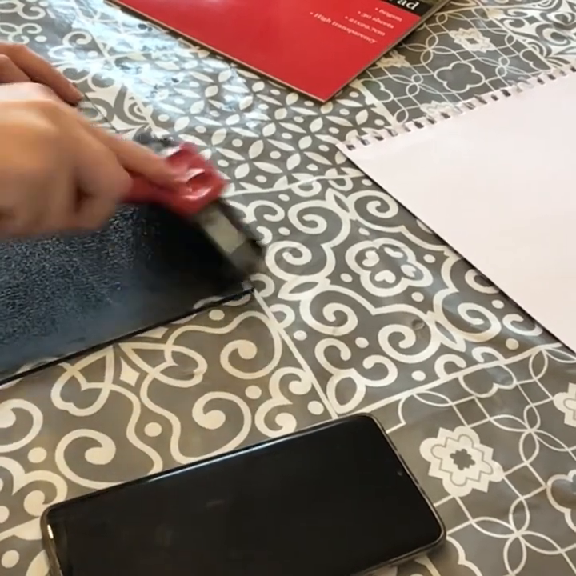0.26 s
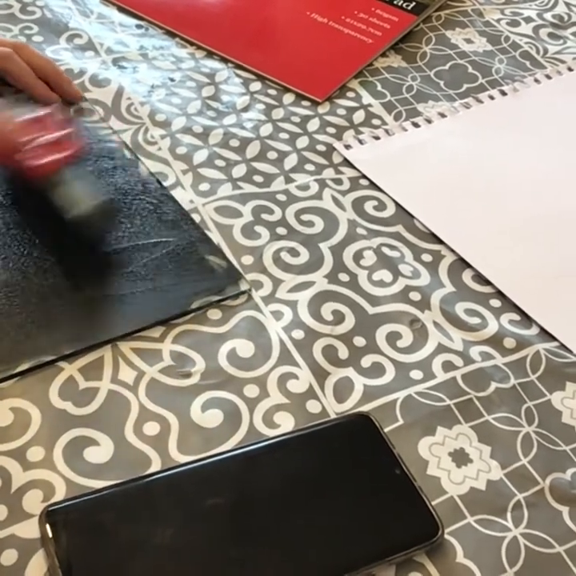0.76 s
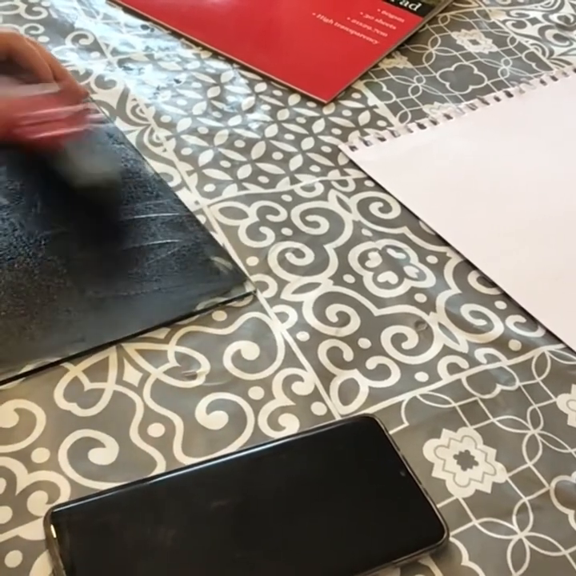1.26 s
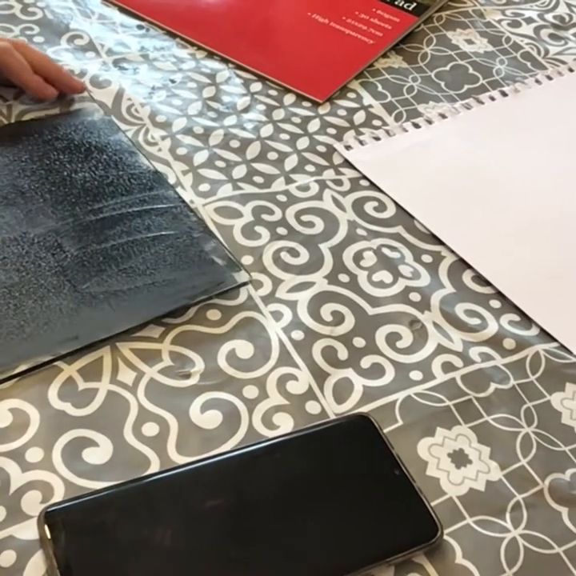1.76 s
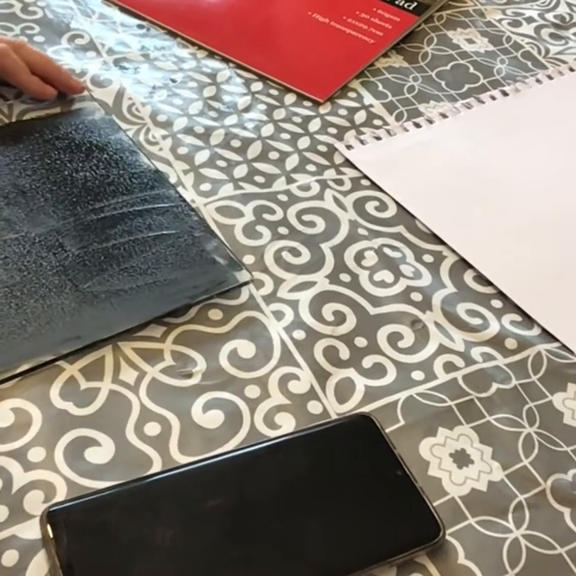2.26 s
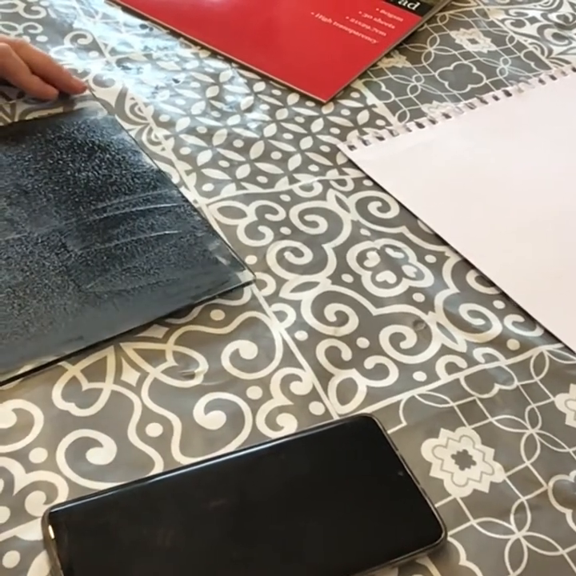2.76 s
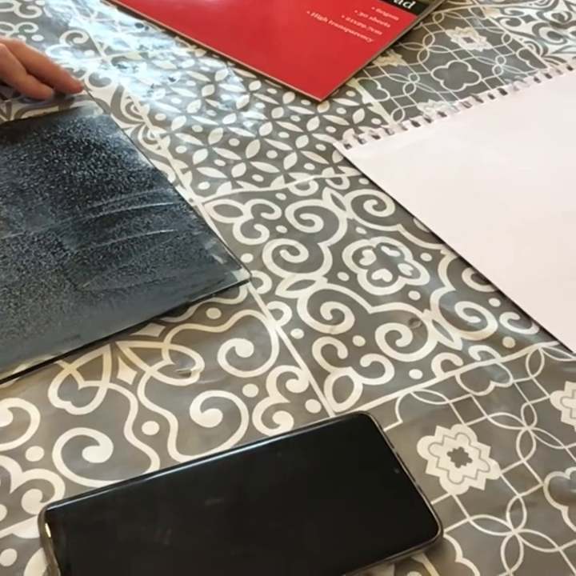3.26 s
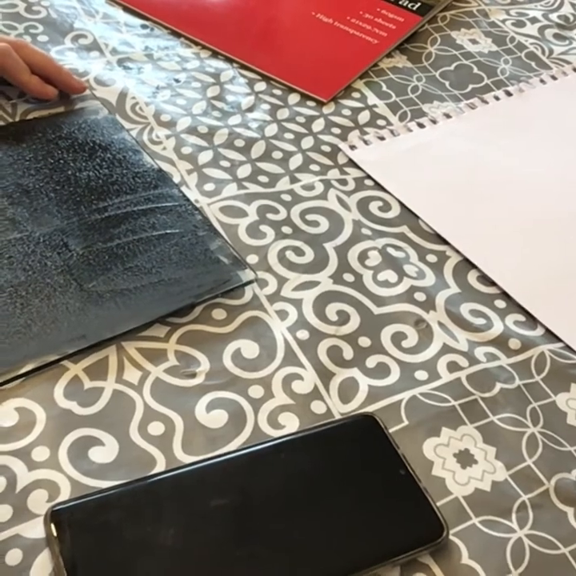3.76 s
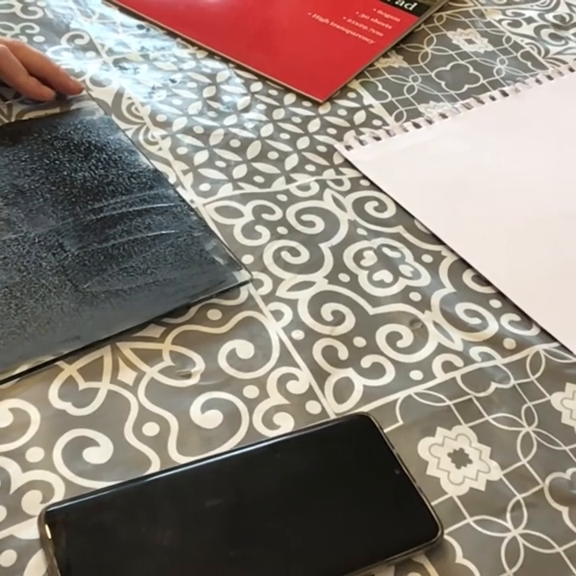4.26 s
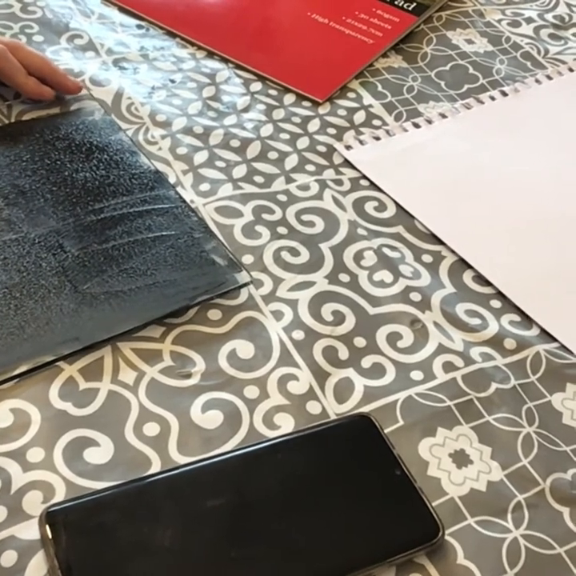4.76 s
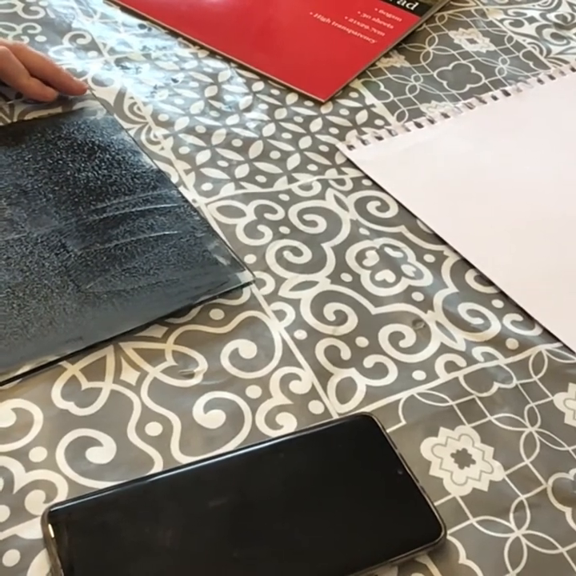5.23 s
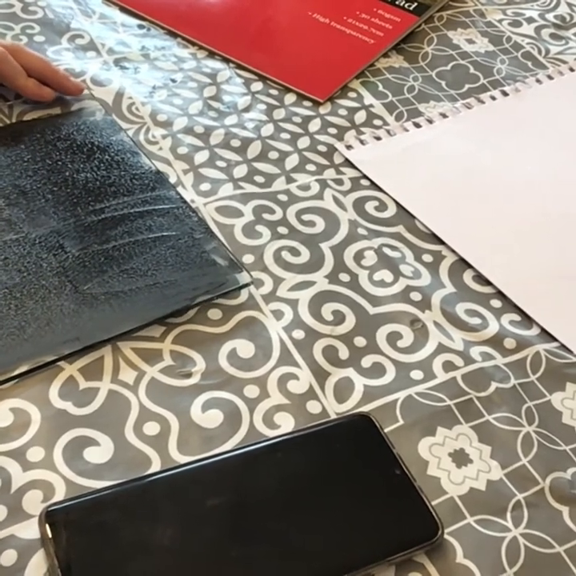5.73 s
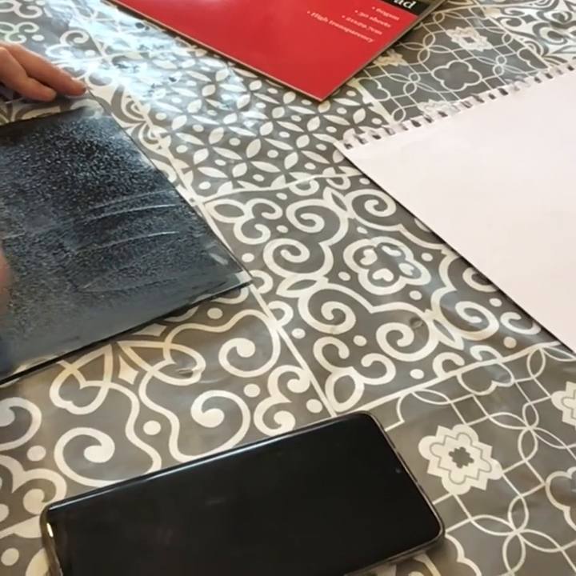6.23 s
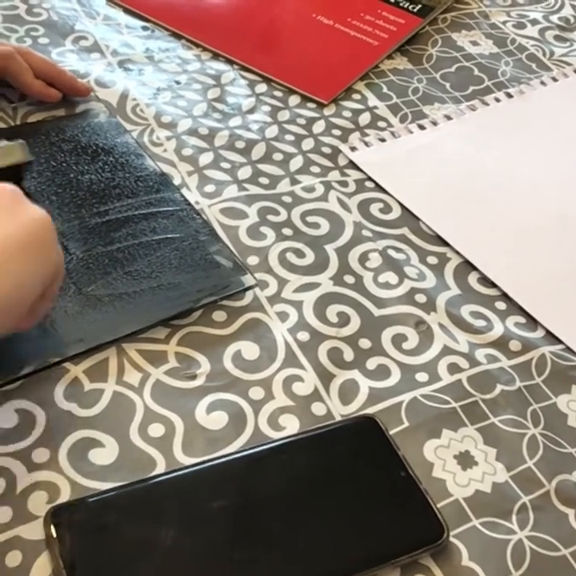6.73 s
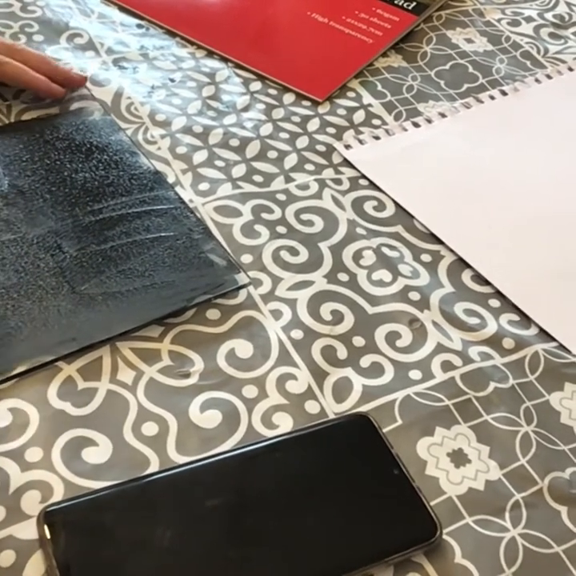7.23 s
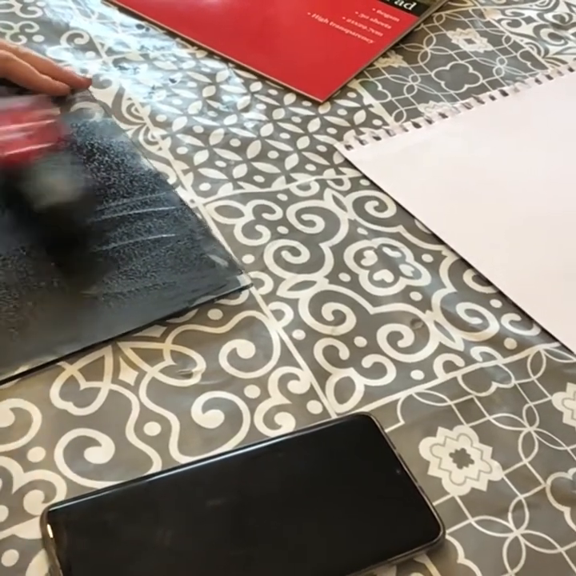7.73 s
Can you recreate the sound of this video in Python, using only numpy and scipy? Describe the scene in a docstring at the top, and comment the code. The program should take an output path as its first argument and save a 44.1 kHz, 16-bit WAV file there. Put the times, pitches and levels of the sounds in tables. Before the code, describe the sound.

From the start, a rubber roller runs back and forth through tacky ink on a glass plate, about six short strokes a second. Each is a bright, hissing crackle with small snaps over a light rasp and rumble. Soft hand thuds come through the table between 1 and 3 seconds, and the strokes briefly weaken around 2.3. Near 3.9 the roller lifts and its loose axle ticks faintly; at 4.3 it lands with a knock. Rolling resumes with heavier pressure and more rumble, then turns much softer from 5.8 until about 7.1. The axle ticks again, the roller's frame clacks sharply on the glass at 7.5, and the rubber knocks down just after. Two longer, strong strokes finish at about 8 seconds. The microphone is near the table in a small room with slight reverberation and a faint hum.

```python
"""Inking a roller on glass

A small room, one small microphone, near enough to the table for the direct sound to lead the room.
A rubber roller is pulled and pushed through tacky ink on a glass plate; ink threads snap behind it
in a bright crackle. The harder the stroke and the hand's pressure, the more the roller rasps and the
plate rumbles. Twice the roller is lifted, rattles in its frame and is set down with a knock."""
import sys
import numpy as np
from scipy import signal
from scipy.fft import rfft, irfft, next_fast_len
from scipy.io import wavfile
from scipy.ndimage import uniform_filter1d, map_coordinates

SR = 44100
rng = np.random.default_rng(int(sys.argv[2]) if len(sys.argv) > 2 else 0)


def generate_wav(signal):
    """Clip the signal to [-1, 1] and save it as 16-bit WAV at the path in sys.argv[1]."""
    frames = np.transpose(np.atleast_2d(signal))
    scaled = np.clip(frames, -1, 1) * 32767
    pcm = np.round(scaled).astype(np.int16)
    wavfile.write(sys.argv[1], SR, pcm)


N = 352359

# strokes of the roller, pull and push in turn: start/s, length/s, strength/dB
ROLLER_STROKES = [(.003, 0.076, -5.5), (0.149, 0.098, -3), (0.31, 0.093, -1.5), (0.463, 0.092, 0.5),
                  (.61, 0.094, -2), (0.766, 0.096, 2), (0.908, 0.11, 1), (1.075, 0.12, 2.5),
                  (1.218, 0.22, 0), (1.495, 0.13, -2.5), (1.652, 0.19, -2), (1.897, 0.15, -2),
                  (2.101, 0.15, -.5), (2.31, .11, -14), (2.504, 0.11, -6.5), (2.632, .1, -2.5),
                  (2.792, 0.09, 2.5), (2.951, 0.1, -1.5), (3.107, 0.083, 1.5), (3.234, 0.12, -2.5),
                  (3.412, 0.096, 0.5), (3.558, 0.085, -1.5), (3.734, 0.11, -4.5), (4.284, 0.12, 1.5),
                  (4.472, 0.12, -4.5), (4.649, 0.12, .5), (4.802, 0.11, -6), (4.971, 0.093, -2),
                  (5.116, 0.12, -6.5), (5.286, .14, 1.5), (5.506, 0.12, -2), (5.64, 0.11, 1),
                  (5.821, 0.094, -10), (5.946, 0.12, -9), (6.123, 0.089, -9.5), (6.254, 0.086, -11.5),
                  (6.393, 0.066, -14.5), (6.538, 0.061, -16.5), (6.638, 0.097, -18.5), (6.798, .1, -13.5),
                  (6.932, 0.15, -9.5), (7.584, 0.26, 1), (7.863, 0.22, 0.5)]
# the rubber lands on the plate: t/s, level/dB, contact cut-off/Hz
LANDINGS = [(1.142, -56.5, 1200), (2.336, -54.5, 1800), (2.635, -47, 2360), (2.942, -46, 2180),
            (3.253, -52.5, 2230), (3.785, -43.5, 2210), (4.2767, -23, 1880), (6.955, -50.5, 1380),
            (7.01, -43, 1680), (7.5781, -24.5, 1710)]
OTHER_END_S = 0.002724  # the roller's second end lands this long after the first


def ink(crackle_db=-37.5, snap_db=-6, snap_t60=0.012, splat_db=-3):
    """Ink threads stretch behind the roller and snap, a few loudly; each landing snaps some too."""
    # the thickest threads part with one loud snap: t/s, level/dB
    thick_snaps = [(.045, -19), (0.158, -20), (.179, -17.5), (0.503, -14), (0.7812, -22), (1.127, -13),
                   (1.541, -20.5), (1.589, -20), (2.393, -26.5), (2.511, -25), (2.7991, -22.5), (3.11, -25),
                   (3.443, -17), (3.573, -26), (4.662, -19.5), (4.977, -27), (4.996, -23), (5.368, -21),
                   (5.963, -25.5), (6.263, -25), (6.3234, -29), (6.802, -40), (6.824, -36), (6.844, -32),
                   (6.8497, -28)]
    # the ink's crackle as heard, with the microphone's bright resonance near 12 kHz: f/Hz, level/dB
    spectrum = [(1500, -44.5), (3500, -23), (5000, -16), (6700, -7.5), (7700, -10), (9000, -10.5),
                (10100, -16.5), (10900, -4), (11800, 4), (12500, 0), (13600, -7), (15000, -7), (16000, -15)]
    pops = amp(crackle_db) * stroke_bursts(
        [db for _, _, db in ROLLER_STROKES], rate=1800, spread_db=4.5, life_s=0.00039,
        hiss=0.26, arch=2.1, lead_s=0, clump_db=3.0, rate_by_strength=0.73)
    splats = [(s + OTHER_END_S, db + splat_db) for s, db, _ in LANDINGS]
    t = np.arange(SR // 50) / SR
    for s, db in thick_snaps + stroke_snaps() + splats:
        add(pops, s, amp(db + snap_db) * fade(t, snap_t60) * rng.standard_normal(len(t)))
    crackle = coloured(pops, lambda hz: amp(along(spectrum, hz)))
    return shifting_colour(crackle, depth_db=1.7, window=256)


def stroke_snaps(breakaway_s=0.0046, push_sticks_db=4, scatter_db=15):
    """Ink set during the turn lets go, harder on a push; then two thicker threads part at random."""
    snaps = []
    for k, (start, length, strength_db) in enumerate(ROLLER_STROKES):
        release = start + breakaway_s
        snaps.append((release, -35.5 + 0.64 * strength_db - push_sticks_db * (-1) ** k))
        for place, weakness in rng.random((2, 2)):
            delay = 0.54 * length * place ** 1.1  # mostly early in the stroke
            snaps.append((release + delay, -29 + 0.19 * strength_db - scatter_db * weakness))
    return snaps


def rolling(rasp_db=-53.5, rumble_db=-56.5):
    """Rolling shakes the roller and the plate, from a little before the ink begins to tear."""
    # resonances of the turning roller: f/Hz, width/Hz, level/dB
    roller_modes = [(2540, 183, 1.5), (3087, 64, 0), (4040, 2000, -7), (4100, 280, -2), (6200, 770, -6.5)]
    # resonances of the roller pressed on the glass: f/Hz, width/Hz, level/dB
    pressed_modes = [(223, 11, 6), (278.5, 18.6, 8), (450, 15, 3.5), (561.5, 26, 6), (661, 73, 3),
                     (963, 39, -1.5), (1298, 89, 4.5), (1460, 49, 4.5), (1712, 57, -1.5)]
    # spectrum of the plate's rumble: f/Hz, level/dB
    spectrum = [(60, -21), (130, 8), (200, 2), (310, -1.5), (380, -4), (500, -12), (720, 0.5), (1050, -3),
                (1600, -5), (2000, -6.5), (3000, -4), (6000, -54)]
    rasp = stroke_bursts(
        shaking_db(by_strength=0.47, by_pressure=0.3), rate=2900, spread_db=4.0, life_s=0.00041,
        hiss=0.38, arch=2.9, lead_s=0.016, clump_db=3.0, rate_by_strength=0.33)
    rumble = stroke_bursts(
        shaking_db(by_strength=0.34, by_pressure=0.86), rate=1400, spread_db=0.5, life_s=0.00055,
        hiss=0.58, arch=1.9, lead_s=0.017, clump_db=2.06, rate_by_strength=0.085)
    roller = coloured(rasp, lambda hz: resonances(roller_modes, hz))
    plate = coloured(rumble, lambda hz: np.hypot(amp(along(spectrum, hz)), resonances(pressed_modes, hz)))
    return shifting_colour(amp(rasp_db) * roller + amp(rumble_db) * plate, depth_db=2.0, window=1024)


def shaking_db(by_strength, by_pressure, pull_db=0.5):
    """Each stroke shakes a part more with strength and hand pressure, and a pull more than a push."""
    # how hard the hand presses: t/s, level/dB
    pressure = [(0, -2.5), (1.1, -2), (1.3, 1), (2.7, -.5), (3.8, -1), (4.35, 6.5), (4.8, 7), (5.1, 3.5),
                (5.4, 3.5), (5.85, 1), (6.15, -1.5), (6.3, -4), (7, 1), (8, 0.5)]
    start, length, strength_db = np.transpose(ROLLER_STROKES)
    pressure_db = np.interp(start + length / 2, *np.transpose(pressure))
    direction = (-1) ** np.arange(len(start))
    return by_strength * strength_db + by_pressure * pressure_db + pull_db * direction


def roller_speed(start, length, fastest_share=0.47):
    """The roller gathers speed and slows to the turn: its samples, and an arch from 0 to 1 to 0."""
    span = np.arange(max(0, round(start * SR)), min(N, round((start + length) * SR)))
    progress = (span / SR - start) / length
    return span, np.sin(np.interp(progress, [0, fastest_share, 1], [0, np.pi / 2, np.pi]))


def stroke_bursts(levels_db, rate, spread_db, life_s, hiss, arch, lead_s, clump_db, rate_by_strength):
    """Tiny random noise bursts under each stroke; more speed and strength mean more of them."""
    power, chance = np.zeros(N), rng.random(N)
    sizes = amp(spread_db * np.clip(rng.standard_normal(N), -2, 2))
    tack = amp(clump_db * np.clip(wobble(rate=60), -2, 2)) ** 2  # uneven ink tears in clumps
    for (start, length, strength_db), db in zip(ROLLER_STROKES, levels_db):
        span, speed = roller_speed(start - lead_s, length + 2 * lead_s)
        drive = np.abs(speed) ** arch
        bursts_per_s = rate * amp(rate_by_strength * strength_db) * drive
        bursts = (chance[span] < bursts_per_s / SR) * sizes[span] ** 2
        bursts *= drive.sum() / (bursts.sum() + 1e-9)
        energy = (bursts + hiss * drive) * tack[span]  # the finest threads merge into a hiss
        power[span] += amp(db) ** 2 * energy * drive.sum() / (energy.sum() + 1e-9)
    decay = np.exp(-1 / (life_s * SR))
    envelope = np.sqrt(signal.lfilter([1 - decay], [1, -decay], power))
    return envelope * rng.standard_normal(N)


def shifting_colour(x, depth_db, window):
    """The colour drifts a little, at random, as the roller reaches other parts of the plate."""
    spectra = signal.stft(x, nperseg=window)[2]
    drift = rng.standard_normal(spectra.shape)
    for axis in (0, 1, 0, 1):
        drift = uniform_filter1d(drift, size=8, axis=axis)
    gain = unit(amp(depth_db * unit(drift)))
    return signal.istft(spectra * gain, nperseg=window)[1][:N]


def plate_knocks(other_end_db=-2):
    """The roller lands one end after the other and rings the glass."""
    # modes of the glass plate on the table: f/Hz, level/dB, t60/s
    plate_modes = [(569.5, -12, 0.13), (645, -4, 0.043), (717, -8.5, 0.057), (841, -4.5, 0.029),
                   (975, -8.5, 0.022), (1252, -4, 0.072), (1408, 0.5, 0.025), (1614, 3, 0.02),
                   (2000, -21, 0.023), (2560, -15.5, 0.03), (3020, -27, 0.023)]
    other_ends = [(s + OTHER_END_S, db + other_end_db, cut_hz) for s, db, cut_hz in LANDINGS]
    return blows(LANDINGS + other_ends, plate_modes,
                 crack=2.1, crack_t60=0.034, scatter_db=7.0, detune=0.0041)


def frame_clacks():
    """The roller's frame strikes the glass and rings briefly."""
    # contacts with the glass: t/s, level/dB, contact cut-off/Hz
    clacks = [(7.4585, -55, 4000), (7.4652, -25.5, 5050), (7.471, -32.5, 3480), (7.5453, -36.5, 4130)]
    # modes of the frame: f/Hz, level/dB, t60/s
    frame_modes = [(259, -15, 0.086), (560, -11, .1), (628, -8.5, 0.065), (942, -19, 0.1),
                   (1410, -14, 0.04), (1820, -12, 0.082), (1990, -5.5, 0.0077), (2860, 1.5, 0.014),
                   (3130, -3, 0.011), (3640, 4, 0.0078), (5757, 1, 0.0083)]
    return blows(clacks, frame_modes, crack=3.0, crack_t60=0.0074, scatter_db=0.5, detune=0.0055)


def axle_ticks():
    """The loose axle ticks in its bearings while the roller is in the air."""
    # contacts with the bearings: t/s, level/dB, contact cut-off/Hz
    ticks = [(3.948, -54.5, 2000), (3.9739, -44, 3680), (3.9878, -49, 6860), (4.05, -51.5, 3450),
             (7.239, -61.5, 7040), (7.289, -53, 2900), (7.318, -56, 1810), (7.378, -54.5, 3540)]
    # modes of the axle: f/Hz, level/dB, t60/s
    axle_modes = [(902, -9.5, 0.09), (1785, -1.5, 0.035), (2400, -4, 0.014), (2780, 0, 0.029),
                  (3400, -6, 0.007), (4700, -8, 0.0036), (6170, 13.5, 0.0077)]
    return blows(ticks, axle_modes, crack=2.5, crack_t60=0.032, scatter_db=9.0, detune=0.021)


def blows(contacts, modes, crack, crack_t60, scatter_db, detune):
    """Each contact rings the modes under a short crack; a softer contact is duller."""
    track, t = np.zeros(N), np.arange(SR // 4) / SR
    bass_cut = signal.butter(2, 520, "highpass", fs=SR)  # a small object radiates little bass
    for s, db, cut_hz in contacts:
        pitch = 1 + detune * rng.standard_normal()  # grip and point of contact shift the pitch
        ring = np.zeros(len(t))
        for k, (hz, mode_db, t60) in enumerate(modes):
            # neighbouring modes move in opposite directions
            gain = (-1) ** k * amp(mode_db + scatter_db * rng.standard_normal())
            ring += gain * fade(t, t60) * np.sin(2 * np.pi * hz * pitch * t)
        grit = signal.lfilter(*bass_cut, rng.standard_normal(len(t)))
        hit = ring + crack * fade(t, crack_t60) * grit
        hit = signal.lfilter(*signal.butter(3, cut_hz, fs=SR), hit)
        add(track, s, amp(db) * hit / hit[:SR // 100].std())  # level set over the first 10 ms
    return track


def table_thuds(attack_s=0.0042, hand_cut_hz=110.3, rubber_cut_hz=330, landing_db=-18.5):
    """The table top thuds under each landing and under the soft hand, which reaches only low modes."""
    # the hand's weight bears on the table: t/s, level/dB
    hand_thuds = [(1, -45), (1.327, -43), (1.402, -36.5), (1.51, -42), (1.607, -40.5), (1.739, -32),
                  (1.774, -47), (1.867, -39.5), (2.884, -47), (2.167, -42.5), (2.338, -44.5), (7.1, -51),
                  (7.466, -42), (7.797, -37.5)]
    # modes of the table top: f/Hz, level/dB, t60/s
    table_modes = [(70.3, -11, 0.47), (124.1, 6, 0.2), (173.8, 3, 0.32), (219.4, -1.5, 0.45)]
    track, t = np.zeros(N), np.arange(SR // 2) / SR
    thuds = [(s, db, hand_cut_hz) for s, db in hand_thuds]
    thuds += [(s, db + landing_db, rubber_cut_hz) for s, db, _ in LANDINGS]
    attack = 1 - np.exp(-t / attack_s)
    for s, db, cut_hz in thuds:
        for hz, mode_db, t60 in table_modes:
            gain = amp(db + mode_db) / np.hypot(1, (hz / cut_hz) ** 5)
            add(track, s, gain * attack * fade(t, t60) * np.sin(2 * np.pi * hz * t))
    return track


def room(x, wet_db, gap_s):
    """Direct sound, then the room's tail, drawn anew three times a second for the moving roller."""
    # colour of the tail, dipped near 12 kHz so the bright peak stays in the direct sound: f/Hz, level/dB
    tail_colour = [(200, 5), (1500, -1.5), (6000, -5.5), (10000, 4.5), (11800, -6.5), (14000, -0.5),
                   (16000, -3)]
    # decay of the room: f/Hz, t60/s
    decay = [(150, 0.48), (700, 0.39), (1500, 0.36), (4000, 0.6), (8000, 0.39), (15000, 0.31)]
    heard, step = x.copy(), SR // 3
    for i in range(0, N, step):
        hz, t, noise = signal.stft(rng.standard_normal(SR // 2), SR, nperseg=256)
        spectra = noise * amp(along(tail_colour, hz))[:, None] * fade(t, along(decay, hz)[:, None])
        tail = signal.istft(spectra, SR, nperseg=256)[1]
        tail *= amp(wet_db) / np.linalg.norm(tail)
        add(heard, i / SR + gap_s, signal.fftconvolve(x[i:i + step], tail))
    return heard


def room_tone(air_db=-63, hum_db=-67, hum_hz=100):
    """Quiet room noise with a mains hum."""
    # spectrum of the room's noise: f/Hz, level/dB
    spectrum = [(20, -24), (40, -5.5), (62, -3), (110, -1.5), (160, -11), (230, -15), (380, -21),
                (700, -21), (2000, -23.5), (4000, -28), (8000, -33.5), (16000, -38)]
    air = coloured(rng.standard_normal(N), lambda hz: amp(along(spectrum, hz)))
    hum = np.sin(2 * np.pi * hum_hz * np.arange(N) / SR)
    return amp(air_db) * air + amp(hum_db) * hum


def amp(db):
    """Decibels to gain."""
    return 10 ** (np.asarray(db) / 20)


def unit(x):
    """Scale to rms 1."""
    return x / np.sqrt(np.mean(x ** 2) + 1e-20)


def along(points, hz):
    """Read (f/Hz, value) points on a log frequency axis."""
    f, values = np.transpose(points)
    return np.interp(np.log(hz + 1), np.log(f), values)


def fade(t, t60):
    """Exponential decay by 60 dB in t60."""
    return np.exp(-np.log(1000) * t / t60)


def add(track, s, sound):
    """Mix a sound into the track at time s."""
    i = max(0, round(s * SR))
    track[i:i + len(sound)] += sound[:max(0, N - i)]


def wobble(rate):
    """A smooth random curve with rate knots a second."""
    return map_coordinates(rng.standard_normal(N // 100), [np.arange(N) * rate / SR], mode="wrap")


def resonances(modes, hz):
    """Joint gain of resonances given as f/Hz, width/Hz, level/dB."""
    return np.sqrt(sum(amp(db) ** 2 / (1 + ((hz * hz - f * f) / (width * (hz + 1))) ** 2)
                       for f, width, db in modes))


def coloured(x, gain):
    """Causal filter with the shape gain(Hz) that keeps the power of white noise."""
    size = 2 * next_fast_len(N // 2 + SR // 4)
    shape = unit(gain(np.fft.rfftfreq(size, 1 / SR)))
    cepstrum = irfft(np.log(np.maximum(shape, 1e-6)))
    cepstrum[1:size // 2] *= 2  # folded for minimum phase
    cepstrum[size // 2 + 1:] = 0
    return irfft(rfft(x, size) * np.exp(rfft(cepstrum)), size)[:N]


def scene():
    """What reaches the microphone: strokes, knocks and rattles in the room, thuds and room tone."""
    knocks = plate_knocks()
    rattles = frame_clacks() + axle_ticks()
    strokes = room(ink(), wet_db=-5.0, gap_s=0.003) + room(rolling(), wet_db=-5.5, gap_s=0.004)
    contacts = room(knocks, wet_db=-5.0, gap_s=0.0065) + room(rattles, wet_db=-7.5, gap_s=0.0023)
    return (strokes + contacts + table_thuds() + room_tone())[None]


def record(dry, low_hz=42, top_hz=16000):
    """The small mono microphone loses the deep bass, and nothing is kept above the band limit."""
    thin = signal.lfilter(*signal.butter(2, low_hz, "highpass", fs=SR), dry)
    size = next_fast_len(N + SR // 4)
    in_band = np.fft.rfftfreq(size, 1 / SR) < top_hz
    return irfft(rfft(thin, size) * in_band, size)[..., :N]


dry = scene()
out = record(dry)
generate_wav(out)
```